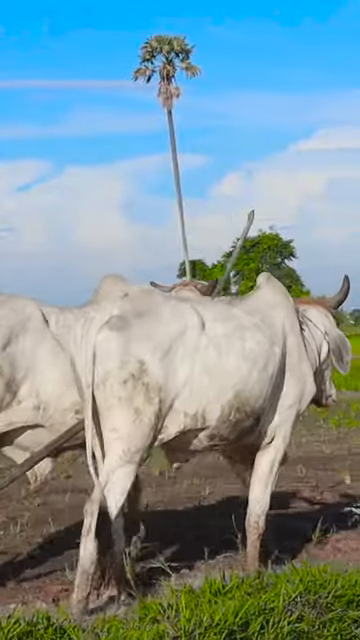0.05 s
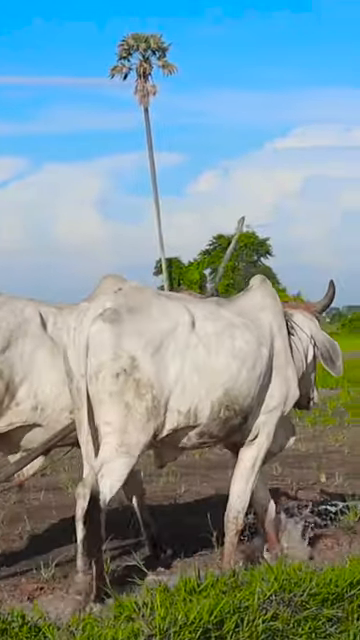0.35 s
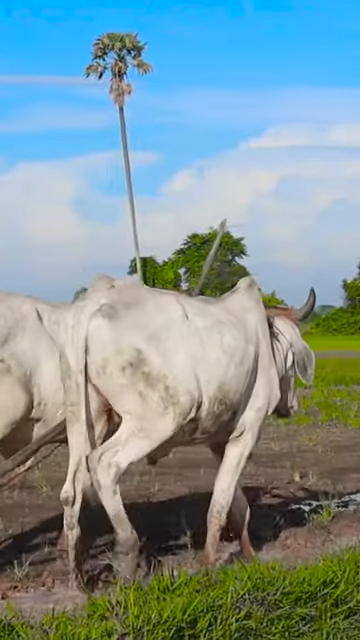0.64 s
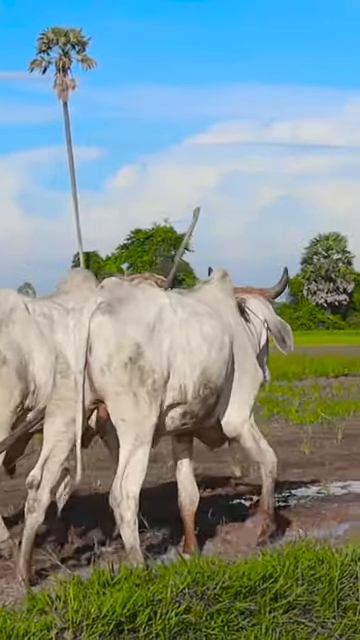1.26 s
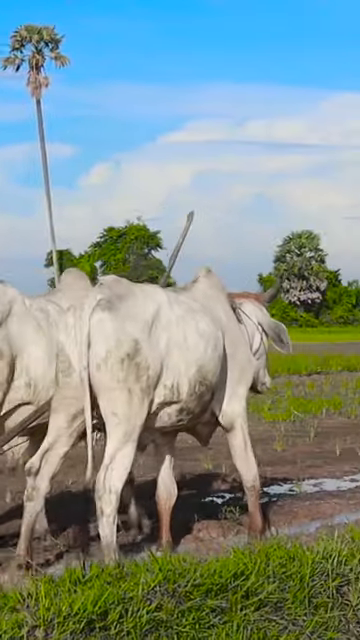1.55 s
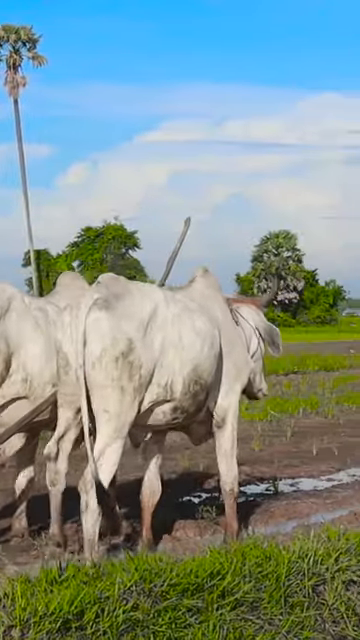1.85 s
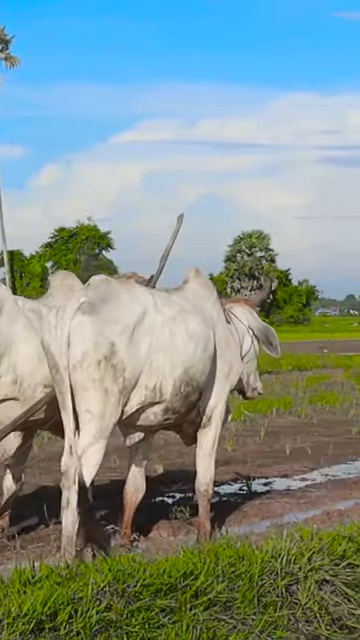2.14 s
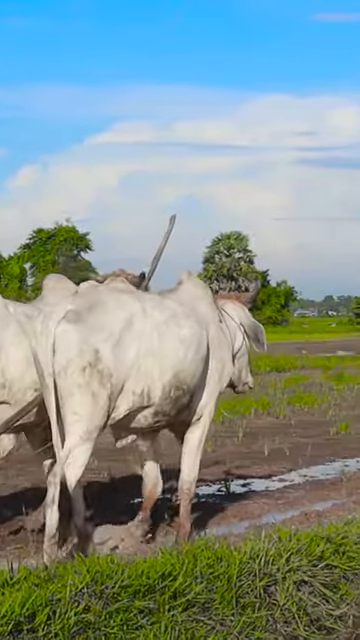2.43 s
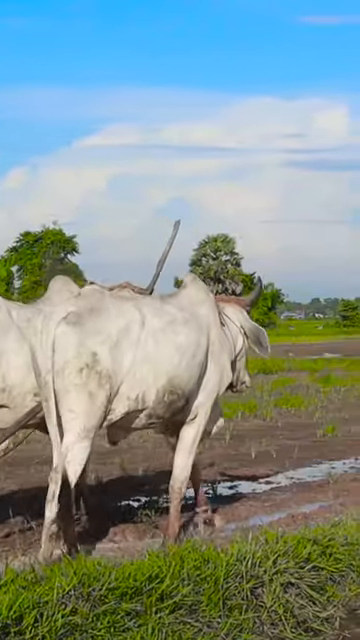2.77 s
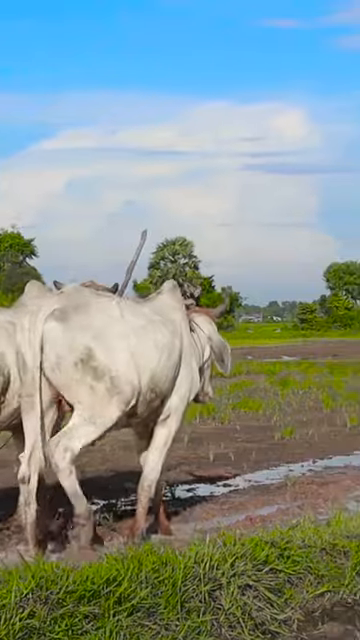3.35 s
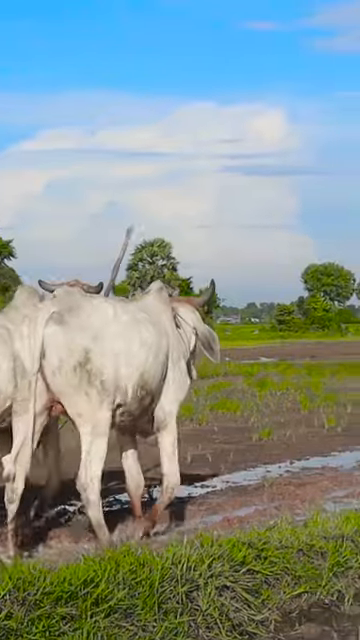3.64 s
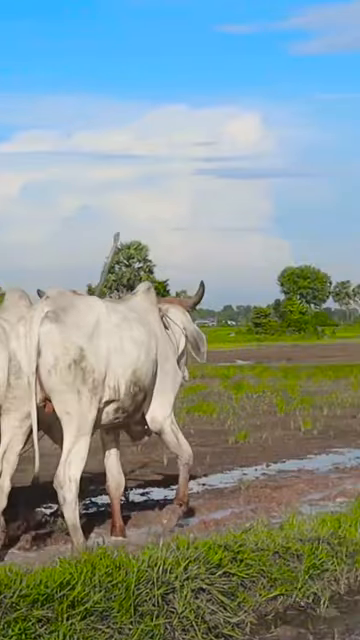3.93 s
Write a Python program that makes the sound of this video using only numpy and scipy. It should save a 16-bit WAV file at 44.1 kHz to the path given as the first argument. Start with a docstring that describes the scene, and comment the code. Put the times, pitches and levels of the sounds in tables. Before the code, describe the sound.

Oxen plod through mud with squelches and soft thuds as wind flutters and birds chirp.

```python
"""Oxen in a wet field

Oxen plod through mud a few metres away. Each hoof squeezes out bubbles and spray, some with a soft
thud. Gusts of wind flutter and pop on the microphone's two openings, left and right. Farther off,
small birds whistle and chip over a faint insect buzz and the hiss of the open field."""
import sys
import numpy as np
from scipy import signal
from scipy.fft import rfft, irfft
from scipy.io import wavfile
from scipy.ndimage import uniform_filter1d

SR = 44100
rng = np.random.default_rng(int(sys.argv[2]) if len(sys.argv) > 2 else 0)


def put_to_file(sound):
    """Save the sound as 16-bit audio at rate SR, in the file named by the first command-line argument."""
    columns = np.atleast_2d(sound).T  # one column per channel
    safe = np.clip(columns, -1, 1)
    whole_steps = np.round(safe * 32767)
    wavfile.write(sys.argv[1], SR, whole_steps.astype(np.int16))


N = 176400  # 4 seconds


def amp(db):
    """Turn decibels into a number to multiply by."""
    return 10 ** (np.asarray(db) / 20)


def unit(x):
    """Scale a sound so that its average level (rms) is 1."""
    return x / np.sqrt(np.mean(x ** 2) + 1e-20)


def curve(rows):
    """Join (time_s, value) points with straight lines."""
    return np.interp(np.arange(N) / SR, *np.array(rows).T)


def colour(x, rows):
    """Make some frequencies louder and others softer, following (frequency_hz, gain_db) points."""
    hz, db = np.array(rows).T
    freqs = np.maximum(np.fft.rfftfreq(N, 1 / SR), 1)
    return irfft(rfft(x) * amp(np.interp(np.log(freqs), np.log(hz), db)), N)


def wander(per_s):
    """A value that drifts at random, typically 1 away from zero."""
    step = max(int(SR / per_s), 2)
    stairs = np.repeat(rng.standard_normal(N // step + 1), step)[:N]
    return unit(uniform_filter1d(stairs, step))


def add(out, start_s, x):
    """Mix x into out from a start time on."""
    i = int(np.clip(start_s * SR, 0, N - 1))
    out[i:i + len(x)] += x[:N - i]


def clicks(per_s, scatter_db):
    """Clicks at random times, some louder than others."""
    hits = (rng.random(N) < per_s / SR) * np.sign(rng.standard_normal(N))
    return hits * amp(scatter_db * rng.standard_normal(N))


def swell(progress, rise=0.16, fall=0.38):
    """Fade in, hold and fade out as progress goes from 0 to 1."""
    return np.clip(np.minimum(progress / rise, (1 - progress) / fall), 0, 1)


# How much left and right differ (side) next to what they share (mid): frequency_hz, side_minus_mid_db
STEREO_WIDTH = [(100, -10), (1000, -13.5), (2500, -3), (5000, -1.5), (8000, 0), (13000, 4.5)]

def spread(x, smear_s=0.002):
    """Sound scattered off the ground makes left and right differ, most in the high notes."""
    t = np.arange(N // 100) / SR
    scatter = rng.standard_normal(len(t)) * np.exp(-t / smear_s)
    smeared = irfft(rfft(x) * np.exp(1j * np.angle(rfft(scatter, N))), N)
    mid = colour(x, [(hz, -10 * np.log10(1 + amp(db) ** 2)) for hz, db in STEREO_WIDTH])
    side = colour(smeared, [(hz, -10 * np.log10(1 + amp(-db) ** 2)) for hz, db in STEREO_WIDTH])
    return np.array([mid + side, mid - side])


# Tone of the distant hiss: frequency_hz, gain_db
HISS_TONE = [(30, -8), (200, 0), (900, -8.5), (2000, 1), (4000, 1.5), (5300, -1), (6400, -5.5), (7500, 1),
             (9000, -6), (12000, -8.5), (15500, -5)]

def field_hiss(level_db=-49.5):
    """The open field gives a smooth hiss whose level drifts a little."""
    return amp(level_db + .5 * wander(3.1)) * unit(colour(rng.standard_normal(N), HISS_TONE))


# Spells of buzzing: start_s, length_s, level_db
BUZZES = [(.42, .11, -55), (1.59, 0.19, -52.5), (1.82, 0.26, -56.5), (3.35, .14, -58), (3.66, .16, -59)]
# Tone of the buzz: frequency_hz, gain_db
BUZZ_TONE = [(5000, -60), (7500, -20), (7850, 4), (8100, -1), (8500, -24), (11000, -60)]

def insect():
    """An insect buzzes on and off: a thin, high band of noise."""
    t = np.arange(N) / SR
    spells = sum(amp(db) * swell((t - start) / length, rise=.18, fall=.15) for start, length, db in BUZZES)
    return spells * unit(colour(rng.standard_normal(N), BUZZ_TONE))


def note(hz, db):
    """One pure bird note that follows the pitches in hz, fading in and out."""
    fade = swell(np.linspace(0, 1, len(hz)), rise=.2, fall=.2)
    return amp(db) * fade * np.sin(2 * np.pi * np.cumsum(hz) / SR)


def glide(length_s, start_hz, end_hz):
    """A pitch that slides in a straight line."""
    return np.linspace(start_hz, end_hz, int(length_s * SR))


# Falling bird whistles: start_s, length_s, level_db, top_hz, end_hz
WHISTLES = [(.518, .11, -41, 5000, 3200), (.682, .115, -38.5, 5150, 3300), (2.18, .114, -40, 5150, 3100),
            (2.358, .11, -38.8, 5134, 3150)]

def bird_whistles(crest=.3, voice_gap_hz=650, rasp_db=5.5):
    """Raspy whistles rise briefly, then fall, each with a softer second voice below it."""
    out, waver = np.zeros(N), 1 + .024 * wander(700)
    for start, length, db, top_hz, end_hz in WHISTLES:
        progress = np.linspace(0, 1, int(length * SR))
        fall = (np.abs(progress - crest) / (1 - crest)) ** 1.55
        hz = top_hz + (end_hz - top_hz) * fall
        hz *= np.roll(waver, -int(start * SR))[:len(hz)]
        add(out, start, note(hz, db) + note(hz - voice_gap_hz, db - 9))
    return out * unit(amp(rasp_db * np.tanh(wander(400))))  # a fast shake in level makes the rasp


# Soft sliding notes and short, high lisps: start_s, length_s, level_db, start_hz, end_hz
SLURS = [(.83, .15, -49.5, 3870, 3440), (1.668, .105, -47, 4390, 3800), (3.3, .09, -55, 4000, 3750),
         (3.428, .11, -49, 4220, 3680)]
LISPS = [(3.236, .026, -48, 7500, 6800), (3.412, .02, -46, 7400, 6900)]
# A trill of falling notes, faint peeps above it and thin rising chips: start_s, level_db
TRILL = [(2.822, -54), (2.895, -48), (2.968, -47), (3.039, -45.5), (3.108, -50), (3.181, -47.5),
         (3.262, -52)]
PEEPS = [(2.85, -51), (2.905, -50), (3.003, -51), (3.054, -51)]
CHIPS = [(.627, -42), (.824, -35), (1.574, -42.5), (1.797, -38.5), (2.66, -42), (2.889, -42), (3.198, -50),
         (3.551, -46.5), (3.769, -44)]

def bird_calls():
    """Clean notes slide up or down; the slurs and lisps also quiver a little."""
    out, quiver = np.zeros(N), 1 + .012 * wander(500)
    for start, length, db, start_hz, end_hz in SLURS + LISPS:
        hz = glide(length, start_hz, end_hz)
        add(out, start, note(hz * quiver[:len(hz)], db))
    for rows, hz in ((TRILL, glide(.031, 4200, 3700)),
                     (PEEPS, glide(.02, 6250, 6450)),
                     (CHIPS, glide(.012, 7050, 7850))):
        for start, db in rows:
            add(out, start, note(hz, db))
    return out


def birds(echo_db=-12, echo_fade_s=.04):
    """The birds sing and the field gives back a short echo."""
    song = bird_whistles() + bird_calls()
    t = np.arange(N // 10) / SR
    tail = unit(rng.standard_normal(len(t)) * np.exp(-t / echo_fade_s)) / np.sqrt(len(t))
    echo = amp(echo_db) * signal.fftconvolve(song, tail)[:N]
    return spread(song + echo, smear_s=.0039)


# Wind strength at the microphone: time_s, strength_db
GUSTS = [(0, -30), (.13, -32), (.28, -23.5), (.33, -33), (.4, -28.5), (.47, -33), (.5, -28), (.6, -43),
         (.69, -23.5), (.775, -27.5), (.89, -25.5), (1.0, -28.5), (1.13, -29.5), (1.27, -28), (1.43, -30),
         (1.55, -28), (1.63, -34), (1.69, -28), (1.82, -33), (1.88, -29), (2.02, -39.5), (2.13, -39.5),
         (2.33, -34.5), (2.54, -33), (2.69, -38), (2.81, -45), (2.96, -39), (3.16, -36), (3.32, -40),
         (3.4, -32), (3.58, -37), (3.66, -40), (3.8, -48), (3.88, -36), (3.95, -34.5), (4, -45)]
# Tones of big, small and tiny swirls of air: frequency_hz, gain_db
RUMBLE_TONE = [(20, -34), (40, -14), (65, -13), (110, -3), (170, .5), (260, -1.5), (450, -15.5), (900, -45),
               (3000, -80)]
FLUTTER_TONE = [(40, -44), (120, -11), (220, 0), (330, 0), (520, -8.5), (800, -22.5), (1300, -40.5),
                (2500, -52)]
SPUTTER_TONE = [(150, -28), (400, -1), (600, 1), (900, -6), (1250, -8), (2500, -30.5), (8000, -56)]

def wind(breeze_db=-31.5, puff_db=1.7):
    """Big swirls rumble on both openings, small ones flutter on each alone, tiny ones sputter in gusts."""
    gust_db = curve(GUSTS) - breeze_db + puff_db * wander(32)
    shared = unit(clicks(per_s=300, scatter_db=2))
    big = np.array([shared + .4 * unit(clicks(per_s=500, scatter_db=2)) for _ in range(2)])
    small = np.array([clicks(per_s=330, scatter_db=3.5) for _ in range(2)])
    tiny = small + .33 * small[::-1]  # each side gets a little of the other
    rumble = unit(colour(big, RUMBLE_TONE)) * amp(-34.5 + .76 * gust_db)
    flutter = unit(colour(small, FLUTTER_TONE)) * amp(-33 + .99 * gust_db)
    sputter = unit(colour(tiny, SPUTTER_TONE)) * amp(-47 + 1.3 * gust_db)
    return rumble + flutter + sputter


# Single large swirls that hit the microphone: time_s, level_db, pitch_hz, left_minus_right_db
POPS = [(0.009, -9, 520, -5.5), (0.014, -11, 700, -7.5), (0.032, -14.5, 410, -6), (.087, -16, 520, -6),
        (0.101, -3, 606, 5.5), (0.117, -9.5, 450, -6), (.168, -15, 380, -6), (0.174, -10, 520, -7.5),
        (0.189, -12.5, 298, -5), (0.218, -9.5, 420, 6), (0.271, -7, 400, -7), (.277, -12.5, 400, 9),
        (0.301, -14, 310, 11), (0.404, -7.5, 487, 9), (0.417, -15, 420, 6), (0.446, -13, 428, 8),
        (0.493, -13.5, 393, 4), (0.504, -11, 520, 7.5), (0.552, -12.5, 544, 7.5), (0.625, -19.5, 470, -6),
        (0.643, -13, 450, -6), (.67, -12, 550, 7), (0.688, -4.5, 370, 9), (.696, -11, 430, -11),
        (0.709, -10, 390, -7), (0.724, -9, 410, -4), (.735, -13, 430, 5), (0.742, -4.5, 560, -8),
        (0.75, -11, 500, -7), (.788, -13, 360, 12), (0.812, -5, 680, -10.5), (0.831, -11, 440, -6),
        (0.849, -12.5, 360, -9), (.856, -12, 420, -11), (0.882, -8, 520, -8), (0.889, -11, 340, -2),
        (0.895, -9, 464, -9), (0.938, -12, 480, -5), (0.944, -9, 520, -5), (1.037, -10.5, 637, -7),
        (1.197, -15, 390, -3), (1.277, -14.5, 337, 0), (1.386, -16.5, 450, 4), (1.481, -13.5, 460, 7),
        (1.536, -14, 490, -9), (1.562, -18, 450, 9), (1.661, -15, 260, 5), (1.686, -11.5, 307, 4.5),
        (1.791, -14, 270, 8), (1.862, -12, 335, 6), (1.88, -17, 370, -13), (2.489, -19, 370, -11),
        (2.51, -15, 300, -14), (2.518, -12.5, 317, 11), (2.585, -5.5, 342, 10.5), (2.595, -11, 413, 10.5),
        (3.09, -21, 310, -8), (3.285, -21, 340, -5), (3.354, -17.5, 440, -10), (3.384, -11, 380, -11),
        (3.712, -21, 400, 4), (3.884, -21.5, 310, -5)]

def wind_pops(boost_db=1.7, rise_cycles=.16, fall_cycles=.32, lag_s_per_db=.00005):
    """A large swirl sucks, then pushes; it reaches the nearer opening first and harder."""
    out, t = np.zeros((2, N)), np.arange(-N // 400, N // 400) / SR
    for time, db, hz, pan_db in POPS:
        for channel, lead_db in enumerate((pan_db, -pan_db)):
            cycles = (t + lead_db * lag_s_per_db / 2) * hz
            width = np.where(cycles < 0, rise_cycles, fall_cycles)
            pop = np.sin(2 * np.pi * cycles) / np.cosh(cycles / width)
            share = np.sqrt(2 / (1 + amp(-lead_db) ** 2))
            add(out[channel], time + t[0], pop * amp(db + boost_db) * share)
    return out


# Loudness of the mud between squelches: time_s, level_db
CHURN_LEVEL = [(0, -40), (.2, -44.5), (.6, -42), (.88, -50.5), (1.12, -42.5), (1.42, -50), (1.58, -45),
               (1.85, -46), (2.25, -43), (2.7, -46.5), (2.83, -49.5), (3.1, -45), (3.4, -51.5), (3.7, -46),
               (4, -48)]
# Tone of the churning mud: frequency_hz, gain_db
MUD_TONE = [(300, -10), (850, -15), (1300, -0.5), (1800, 1), (2600, -.5), (4000, -6.5), (7000, -13),
            (15000, -23)]

def mud_churn():
    """Stirred mud keeps up a quiet, uneven crackle."""
    crackle = unit(colour(clicks(per_s=1800, scatter_db=4.5), MUD_TONE))
    return crackle * amp(curve(CHURN_LEVEL) + 1.78 * wander(40))


# Soft hoof thuds: start_s, level_db, pitch_hz
THUDS = [(.272, -21.5, 156), (1.174, -14.5, 189), (2.928, -27, 220), (3.579, -29, 140)]

def hoof_thuds(fade_s=.013):
    """A hoof lands with a low note that dies away at once."""
    out, t = np.zeros(N), np.arange(N // 20) / SR
    for start, db, hz in THUDS:
        add(out, start, amp(db) * np.sin(2 * np.pi * hz * t) * np.exp(-t / fade_s))
    return out


def bubbles(length_s, hz, per_s=900, ring_cycles=4, pitch_scatter=.348, pitch_rise=.077, scatter_db=4):
    """A burst of tiny bubbles, each ringing for a few cycles as its pitch slides up."""
    out, t = np.zeros(int(length_s * SR) + N // 200), np.arange(N // 200) / SR
    count = int(np.clip(length_s * per_s, 4, 300))
    for k, (nudge, pitch, loudness) in enumerate(rng.standard_normal((300, 3))[:count]):
        progress = (k + .5 + .5 * np.tanh(nudge)) / count
        cycles = t * hz * np.exp(pitch_scatter * pitch)
        age = cycles / ring_cycles
        ring = np.sin(2 * np.pi * cycles * (1 + pitch_rise * np.tanh(age / 2))) * np.exp(-age)
        add(out, progress * length_s, ring * swell(progress) * amp(scatter_db * loudness))
    return out / np.sqrt(np.sum(out ** 2) / (length_s * SR))


# Hooves squeezing the mud: start_s, length_s, bubble_db, spray_db, bubble_pitch_hz
SQUELCHES = [(0.136, 0.047, -41, -42, 2300), (.288, 0.033, -37.5, -43, 1890),
             (0.366, 0.033, -43.5, -47, 2300), (0.388, .014, -37.5, -36.5, 1700),
             (.503, 0.036, -39.5, -39, 1700), (0.972, 0.06, -36, -35.5, 2190),
             (1.046, .048, -34, -43.5, 1596), (1.166, .028, -29.5, -42, 1253), (1.311, .04, -44, -47, 1500),
             (1.954, 0.034, -38, -46, 1460), (2.083, 0.029, -41.5, -51, 2080), (2.17, .05, -44, -44, 2100),
             (2.259, .13, -44.5, -48, 1770), (2.461, 0.029, -37, -40.5, 1520),
             (2.601, .12, -45.5, -56, 2290), (2.921, 0.035, -37.5, -40, 1666),
             (2.953, .018, -37, -39, 2110), (2.995, 0.021, -46.5, -38, 2000), (3.135, .035, -45, -50, 1800),
             (3.445, .022, -52, -47, 2000), (3.621, .04, -38.5, -41, 2600), (3.632, .055, -39, -56, 660),
             (3.666, .06, -42, -52, 1600), (3.843, .014, -43, -52, 2300)]
# Flung drops landing, and one sharp tick at 3.851 s: time_s, level_db
DROPS = [(.796, -37), (1.48, -39), (1.546, -39), (2.476, -37), (2.786, -37.5), (2.956, -34.5), (3.081, -41),
         (3.851, -36), (3.975, -41.5)]
# Tone of the spray and drops: frequency_hz, gain_db
SPRAY_TONE = [(500, -25), (1500, -8), (3000, 1.5), (4500, 0.5), (7000, -3), (10000, -6.5), (15000, -12.5)]

def hoof_squelches(drop_s=.0055):
    """Each hoof squeezes out bubbles and spray; flung drops, and one sharp tick, sound as very short splashes."""
    t = np.arange(N) / SR
    bubbling, spray_level = np.zeros(N), np.zeros(N)
    for start, length, bubble_db, spray_db, hz in SQUELCHES:
        add(bubbling, start, amp(bubble_db) * bubbles(length, hz))
        spray_level += amp(spray_db) * swell((t - start) / length)
    for time, db in DROPS:
        spray_level += amp(db) * swell((t - time + drop_s / 3) / drop_s)
    spray = unit(colour(clicks(per_s=4000, scatter_db=3), SPRAY_TONE))
    return bubbling + spray_level * spray


def scene():
    """Mix the hooves, the wind, the birds and the open field in stereo."""
    mud = spread(hoof_squelches() + mud_churn()) * amp([[-.4], [.4]])  # slightly to the right
    hooves = mud + hoof_thuds()
    return hooves + wind() + wind_pops() + birds() + spread(insect() + field_hiss(), smear_s=.008)


def record(dry, low_cut_hz=75.5, high_cut_hz=15900):
    """The recorder cuts away the deepest bass and the highest treble."""
    bass_cut = signal.butter(3, low_cut_hz, "high", fs=SR, output="sos")
    treble_cut = signal.ellip(10, .2, 80, high_cut_hz, fs=SR, output="sos")
    return signal.sosfilt(treble_cut, signal.sosfilt(bass_cut, dry))


dry = scene()
out = record(dry)
put_to_file(out)
```